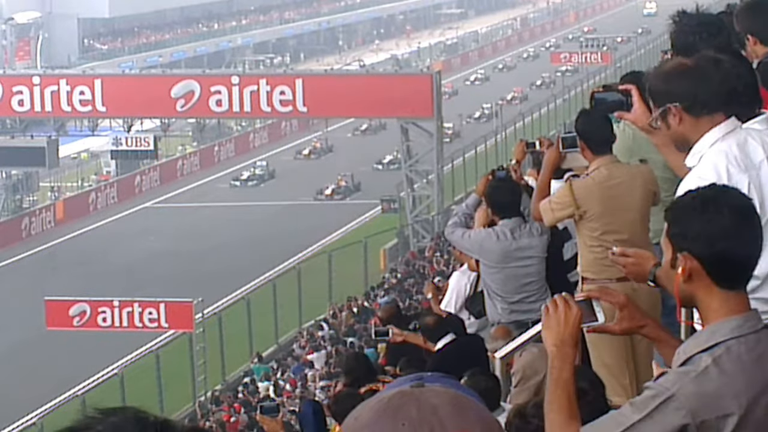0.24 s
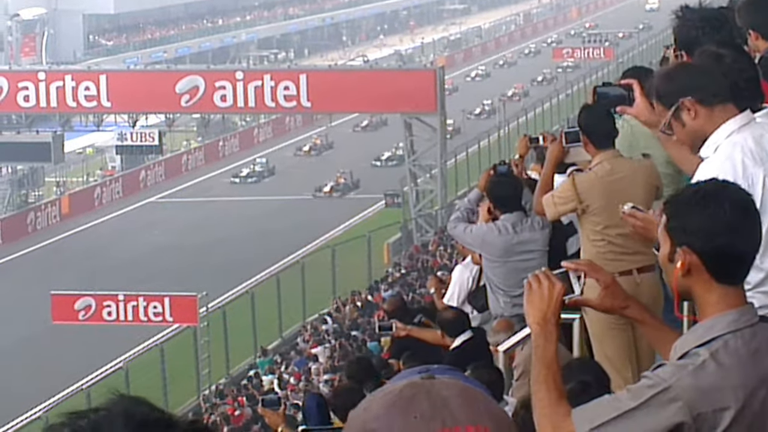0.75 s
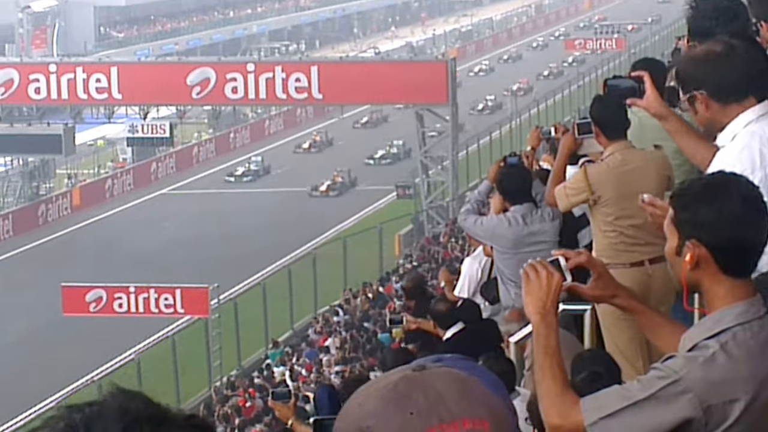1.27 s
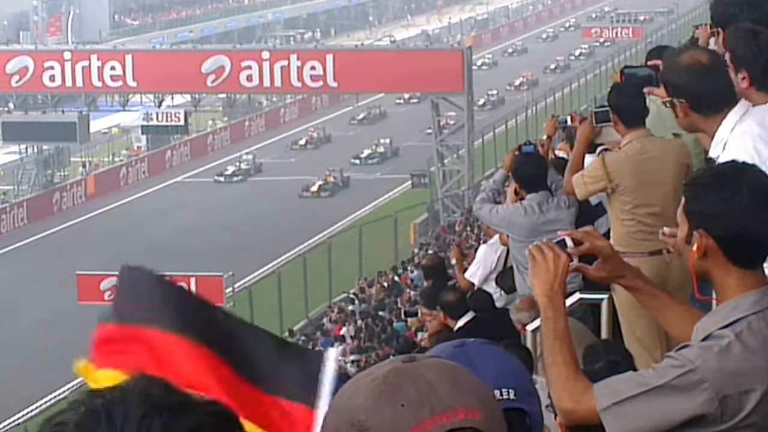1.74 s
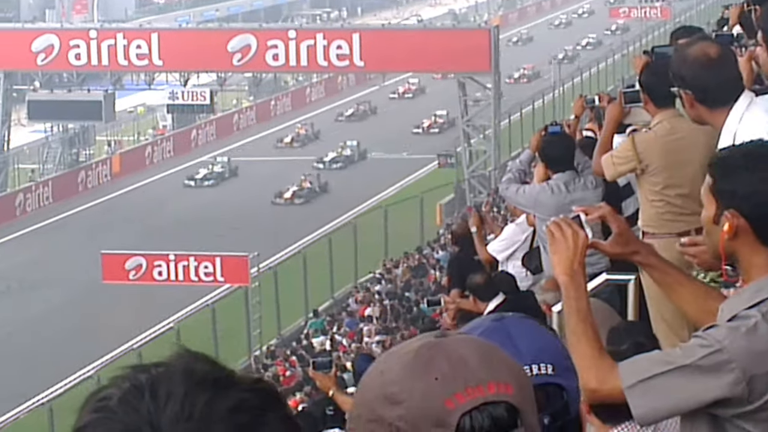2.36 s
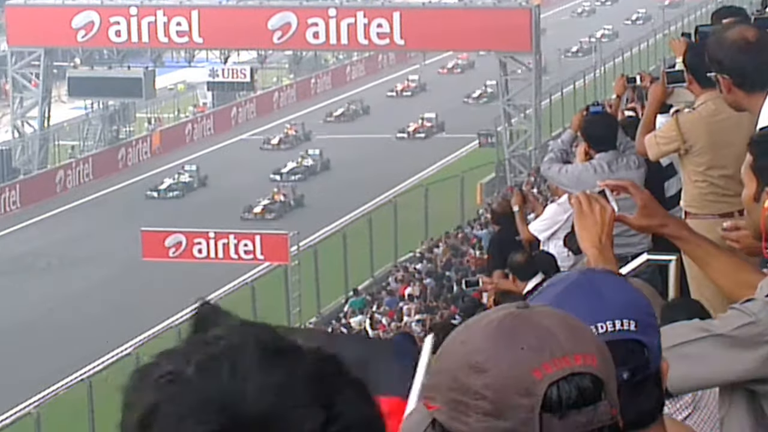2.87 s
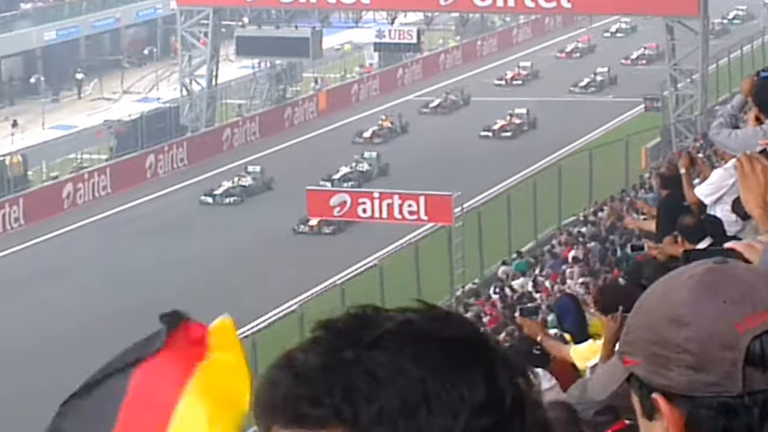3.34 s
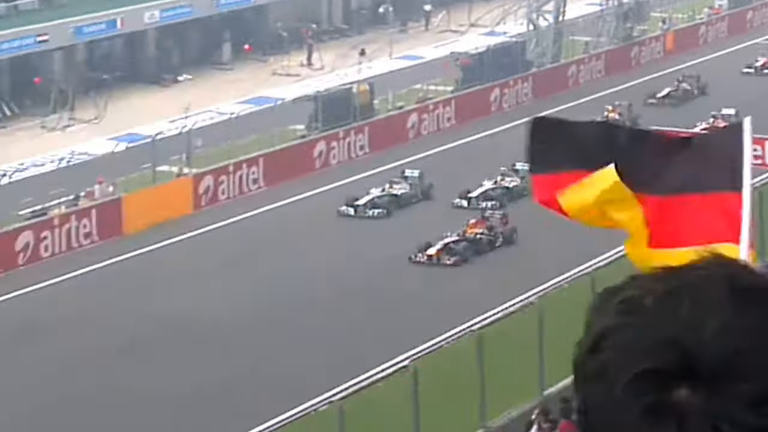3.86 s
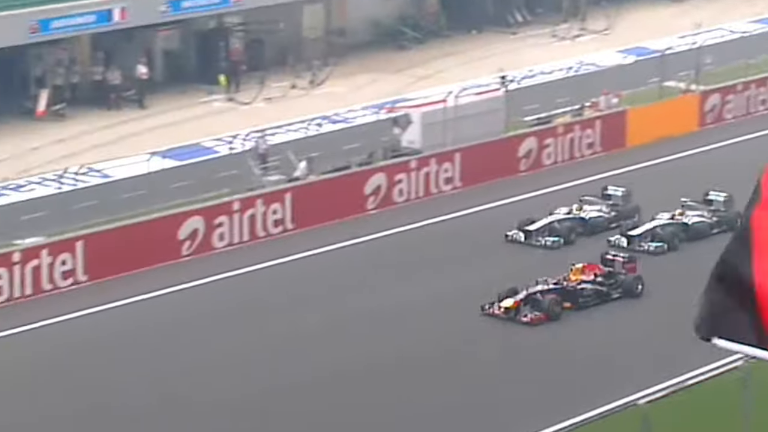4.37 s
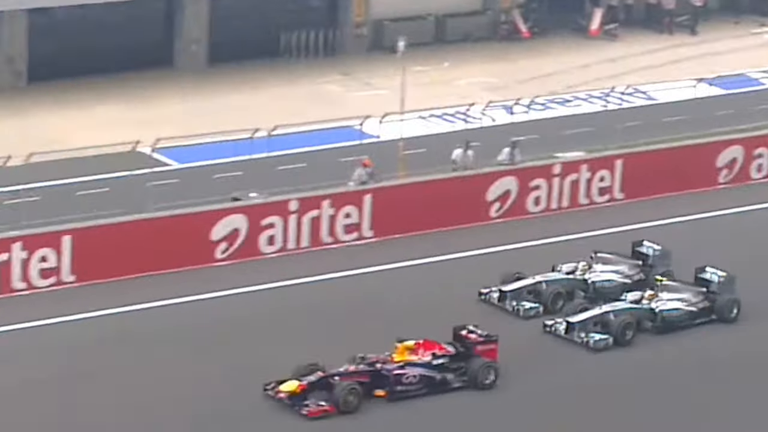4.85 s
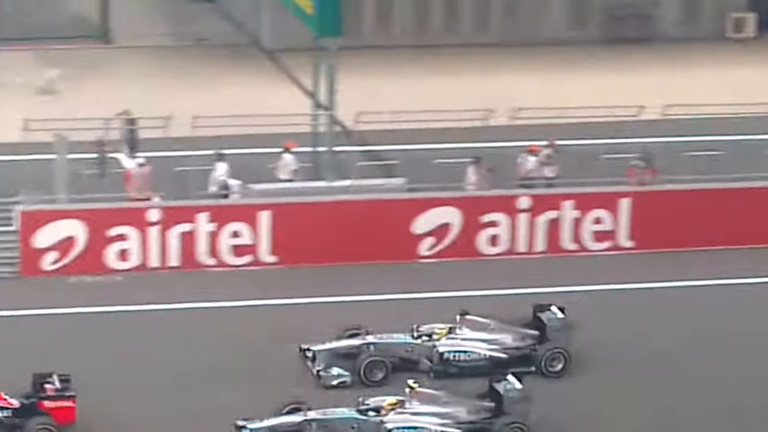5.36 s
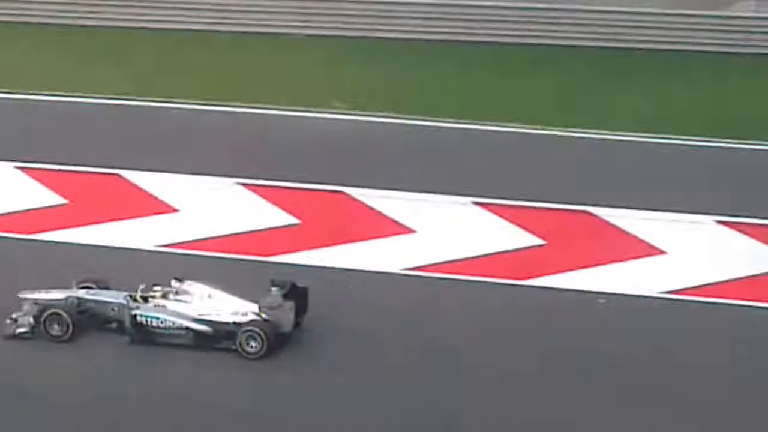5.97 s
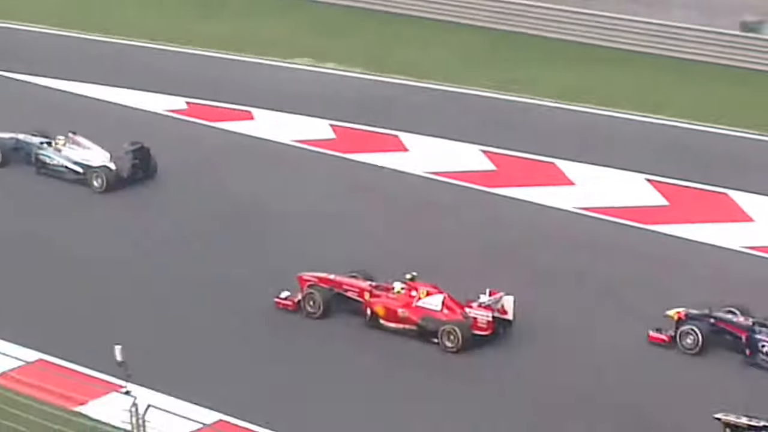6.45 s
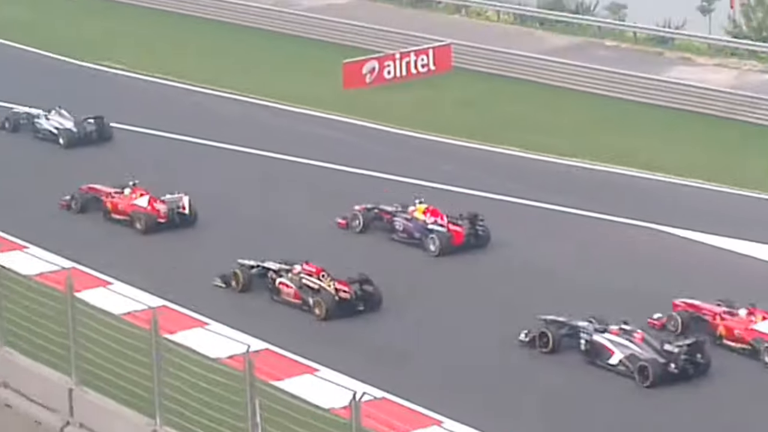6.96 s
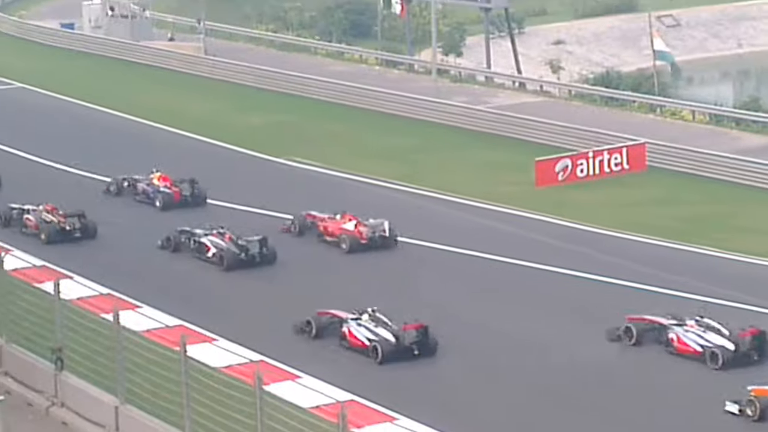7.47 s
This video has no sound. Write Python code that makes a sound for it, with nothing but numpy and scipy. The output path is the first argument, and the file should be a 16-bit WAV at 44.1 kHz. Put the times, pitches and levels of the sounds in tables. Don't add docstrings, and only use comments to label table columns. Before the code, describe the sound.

A grid of high-revving race cars holds a loud, fluttering scream, launches with a low growling bog, then climbs into receding howls past a grandstand.

```python
import sys
import numpy as np
from scipy import signal
from scipy.fft import rfft, irfft, next_fast_len
from scipy.io import wavfile
from scipy.ndimage import uniform_filter1d

SR = 44100
rng = np.random.default_rng(int(sys.argv[2]) if len(sys.argv) > 2 else 0)


def to_linear_factor(level_db):
    exponent = np.asarray(level_db, float) / 20
    return 10 ** exponent


def int16_out(signal):
    q = np.round(np.clip(np.atleast_2d(signal).T, -1, 1) * 32767)
    wavfile.write(sys.argv[1], SR, q.astype(np.int16))


N = 340011
T = np.arange(N) / SR
SIZE = next_fast_len(N + SR)
HZ = np.maximum(np.arange(SIZE // 2 + 1) * SR / SIZE, 1)

# (firing rate of a cylinder bank [Hz], end [s], order 1 [dB], order 2 [dB], order 3 [dB])
GRID = [
    (490.6, .9, -26.5, -30, -28),
    (473.6, 1.22, -41, -27, -26),
    (484.5, 1.1, -44, -22, -40),
    (490.0, 1.27, -46, -29, -31),
    (460.0, .95, -40, -26, -36),
    (453.6, 1.0, -44, -31, -28),
    (430.7, .9, -27, -38, -36),
    (368.5, 1.2, -41, -39, -38),
    (346.0, 1.0, -40, -38, -38),
]
# (time [s], firing rate [Hz], effort [dB])
LAUNCHES = [
    [(1.08, 534.4, 1), (1.25, 539.3, -2.5), (1.36, 557.7, -0.5), (1.65, 563, -2), (1.82, 548, -6)],
    [(1.7, 539.6, -11), (1.88, 510.7, 6.5), (2.0, 506.2, 0), (2.3, 489.5, -10)],
    [(1.7, 343, -2.5), (1.85, 326.6, -0.5), (2.05, 325, 2.5), (2.25, 316, -2.5), (2.45, 324.6, -1)],
    [(1.95, 348.6, -1), (2.2, 337.5, 1.5), (2.35, 343.4, -1.5), (2.47, 355.3, 3), (2.63, 390.2, 1),
     (2.8, 433.3, -24), (3.0, 539, 8.5)],
    [(1.03, 277, 18), (1.25, 267.7, -11.5), (1.5, 282.7, 2), (1.902, 264, 2), (2.399, 277.5, -1.5)],
    [(1.7, 542.4, 0), (1.85, 526, 0), (2.1, 520, -1.5)],
]
# (order 1 [dB], order 2 [dB], .. up to order 4 or 8 [dB])
LAUNCH_ORDERS = [(-50, -23, -35, -39, -50, -37, -50, -50), (-36, -28, -46, -52), (-44, -28, -32, -40),
                 (-39, -34, -41, -46), (-49, -36, -44, -44), (-46, -33, -40, -46, -52, -34.5, -54, -54)]
# (time [s], firing rate [Hz], effort [dB])
RUNS = [
    [(3.0, 626, 4.5), (3.25, 633.2, 2.5), (3.36, 638, -6), (3.5, 636, 3), (3.65, 634, -14)],
    [(3.5, 546, 4.5), (3.8, 584.7, -9), (3.97, 619.5, -1), (4.12, 648, 0.5), (4.3, 655.3, -12)],
    [(3.65, 546.6, 7), (3.85, 563.3, 5.5), (4.05, 582, -5), (4.27, 635, 7.5)],
    [(4.28, 554, 3.5), (4.4, 552.1, 7), (4.6, 586.5, 3), (4.8, 595.3, -8), (5.0, 604.5, -4),
     (5.25, 628.3, -9)],
    [(4.46, 601.4, -1), (4.58, 609, -6), (4.72, 629.4, 2), (4.84, 646, -3), (4.93, 650, -0.5),
     (5.15, 660.5, -8)],
    [(3.05, 507.7, 8), (3.2, 516, -20), (3.55, 494, 3.5), (3.75, 512.8, -3)],
    [(5.12, 568.6, 6), (5.22, 563, 2.5), (5.37, 580, 0)],
    [(5.37, 569, -7), (5.47, 566, 5), (5.57, 559, 1), (5.7, 560.3, -1.5), (5.82, 557.6, 0),
     (6.0, 551.4, -11)],
    [(5.6, 556.4, 1), (5.75, 556.6, -4), (5.9, 547.7, 1), (6.07, 542.6, 3), (6.17, 550.4, -23)],
    [(6.07, 535, -1), (6.2, 529, 3), (6.3, 528, -10), (6.55, 526.8, 5), (6.7, 533, -8)],
    [(6.2, 579, -4), (6.35, 570.2, -5), (6.56, 560, 6)],
    [(6.4, 494, -3), (6.56, 488, 3), (6.75, 509.2, 1), (6.88, 501.3, 0), (7.0, 510, 1), (7.25, 472.2, -9)],
    [(7.03, 643, 1), (7.15, 626.4, -11), (7.3, 641.8, -1), (7.45, 651, 3), (7.55, 647.5, -8)],
    [(7.45, 633, 1), (7.6, 637, -3), (7.75, 630, 2)],
    [(7.25, 610, 1), (7.4, 588, -16), (7.62, 604.7, -7), (7.71, 606, -2)],
]
# (order 1 [dB], order 2 [dB], .. up to order 4 or 8 [dB])
RUN_ORDERS = [(-37, -41, -54, -56), (-44, -38.5, -54, -47, -46, -51, -62, -62), (-44, -43, -53, -62),
              (-47, -48, -55, -62), (-49, -38, -49, -42, -56, -51, -54, -60), (-48, -44, -52, -64),
              (-46, -43, -52, -50), (-53, -47, -47, -42.5, -60, -60, -62, -50), (-60, -39, -52, -60),
              (-68, -45, -50, -60, -60, -56, -45, -64), (-64, -46, -62, -52),
              (-68, -47, -47.5, -55, -60, -49, -62, -62), (-53, -46, -58, -60), (-51, -42, -60, -48),
              (-55, -44.5, -56, -56)]
# (time [s], mean firing rate [Hz], spread between cars [0-1], howl over roar [dB],
# left over right [dB])
PACK = [(0, 457.2, 0.06, 2, 0.5), (.9, 450.8, 0.06, -10.5, 0), (1.3, 318.6, 0.07, -8.5, -0.5),
        (1.7, 325.8, 0.1, 11, 0.5), (2.3, 319.3, 0.13, 4.5, 0), (2.8, 417.9, 0.2, -5, 0),
        (3.2, 558.5, 0.13, 4, 0.5), (4.0, 565.5, 0.15, 3.5, 0.5), (5.0, 597.7, .08, 1.5, -1.5),
        (6.0, 561, 0.07, -7.5, -0.5), (6.8, 532.6, 0.14, -2.5, -0.5), (7.71, 590, 0.07, -5, 1)]
# (time [s], loudness [dB], nearness as treble lift [dB], firing rate of the slowest car [Hz])
APPROACH = [(0, -11.5, -6, 335), (.2, -13.5, -7.5, 350), (.9, -12.5, -3.5, 364), (1.4, -16.5, 6.5, 310),
            (1.7, -16.5, -2.5, 318), (2.1, -14.5, -1, 350), (2.6, -18.5, -5, 353), (3.0, -23, -2, 397.4),
            (3.3, -29.5, 4, 425), (3.7, -24, -4.5, 460), (4.1, -31, 8.5, 513.8), (4.4, -29, 5, 520.2),
            (4.8, -32.5, 17, 527.2), (5.3, -33.5, 17.5, 480), (5.8, -38.5, 26.5, 424),
            (6.4, -37, 25, 464.7), (7.0, -34.5, 18, 473.8), (7.71, -35.5, 19.5, 434)]
# (frequency [Hz], level per Hz [dB])
COLOUR = [(190, -60), (273, -20), (498, -6), (650, -2.5), (820, -1.5), (1130, 4), (1450, -5.5),
          (2010, -12.5), (2900, -8.5), (3800, -12), (4820, -23), (7700, -22), (8600, -28.5), (15800, -40)]
# (edge 1 [Hz], edge 2 [Hz], edge 3 [Hz])
RANGE_EDGES = (430, 1800, 5000)
# (range 1 [dB], .. range 4 [dB])
RANGE_LEVELS = (-17.5, -4.5, -7.5, -24.5)
# (range 1 [dB/dB], .. range 4 [dB/dB])
LIFT_SHARE = (0.01, 0.0036, 0.51, 0.93)
# (range 1 [dB/dB], .. range 4 [dB/dB])
GUST_SHARE = (0.53, 0.23, 0.93, 0.8)
# (time [s], level [dB], length [s])
GUSTS = [(.11, 7, 0.024), (.22, 8.5, 0.029), (.28, -3.5, 0.0079), (.44, 7, 0.1), (.55, -6, 0.049),
         (.73, 7.5, 0.011), (.79, -6.5, 0.027), (.87, 2, 0.049), (.91, -2, 0.046), (1.06, 3, 0.057),
         (1.18, -3.5, 0.045), (1.31, -5, 0.0077), (1.5, 4.5, 0.041), (1.67, -2, 0.045), (1.74, 8, 0.007),
         (1.78, -12, 0.005), (1.87, 10.5, 0.0069), (1.97, 5.5, 0.014), (2.03, -4, 0.025),
         (2.17, 3.5, 0.023), (2.21, -6.5, 0.013), (2.31, -3, 0.024), (2.42, 5.5, 0.013), (2.56, -1, 0.066),
         (2.77, 9.5, 0.013), (2.95, -2.5, 0.036)]
# (time [s], level [dB])
SWEEPS = [(3.87, 4), (4.46, -4.5), (4.55, 6.5), (4.84, 5.5), (5.19, 2.5), (5.27, -4), (5.58, 6.5),
          (5.89, 4), (6.039, -5), (6.131, 5), (6.259, 3.5), (6.41, 5), (7.19, 2.5), (7.24, -1), (7.3, 3),
          (7.54, -6), (7.62, 3.5)]
# (time [s], peak level [dB])
SURGES = [(0.018, 4.5), (0.056, -7.5), (0.124, -5.5), (0.163, -7), (0.21, -6.5), (0.283, -13.5),
          (0.309, -4), (0.39, -1), (0.414, -6), (0.454, -8.5), (0.509, -9), (0.547, -9), (0.586, -7),
          (0.662, -1), (0.724, -10), (0.77, -4), (0.81, 0.5), (0.864, 5), (0.931, -1.5), (0.984, -8),
          (1.013, -5), (1.054, -4), (1.171, -11), (1.211, -0.5), (1.243, -3.5), (1.276, -6.5), (1.318, -12),
          (1.379, -8.5), (1.484, -8.5), (1.544, 0.5), (1.607, -4.5), (1.687, -16), (1.799, -2),
          (1.863, -17), (1.96, -15), (2.009, -4), (2.041, -5), (2.097, -7), (2.253, -0.5), (2.678, -4)]
# (time [s], depth [dB], length [s])
LULLS = [
    (0.529, -3.5, 0.011),
    (.543, -13.5, 0.0031),
    (0.797, -2, 0.004),
    (1.188, -1, 0.0078),
    (1.668, -6, 0.0056),
    (1.682, -12, 0.0044),
    (1.71, -3, 0.011),
    (2.21, 1, 0.03),
]
# (time [s], peak level above 9 kHz [dB])
OVERLOAD_TICKS = [
    (0.0373, -41),
    (0.392, -50),
    (0.4507, -47.5),
    (0.727, -34.5),
    (0.866, -44),
]
# (frequency [Hz], left-right likeness [0-1])
LIKENESS = [(60, 0.44), (150, 0.87), (380, 0.85), (620, 0.7), (950, 0.56), (2380, 0.3), (5980, 0.24),
            (15000, 0.38)]
# (frequency [Hz], left over right [dB])
LEANING = [(60, -1.5), (150, -0.5), (380, 4), (950, 2), (2380, 1.5), (5980, -4.5), (15000, 0)]


def in_time(rows, t=T):
    s, *columns = np.transpose(rows)
    return [np.interp(t, s, column) for column in columns]


def at_hz(points, hz):
    table_hz, value = np.transpose(points)
    return np.interp(np.log(hz), np.log(table_hz), value)


def drift(rate_hz, size=N):
    r = np.exp(-80 * np.pi * rate_hz / SR)
    noise = rng.standard_normal(size // 40 + 1002)
    slow = signal.lfilter([1], [1, -2 * r, r * r], noise)[1000:]
    return np.interp(np.arange(size) / 40, np.arange(len(slow)), slow) * 2 * (1 - r) ** 1.5


def bumps(rows):
    t = T[::32]
    total_db = sum(db * np.exp(-((t - s) / length).clip(-9, 9) ** 2) for s, db, length in rows)
    return np.interp(T, t, total_db)


def shaped(x, response):
    return irfft(rfft(x, SIZE) * response, SIZE)[..., :N]


def evened(x):
    return x / np.sqrt(uniform_filter1d(np.mean(x ** 2, axis=0), size=8820) + 1e-18)


def voiced(curves, orders):
    return [[(s, hz, *np.add(order_db, effort_db)) for s, hz, effort_db in curve]
            for curve, order_db in zip(curves, orders)]


def engine(rows, wobble, fade_db, half_db, upper_db, uneven_db, scatter_hz):
    start, stop = round(rows[0][0] * SR), min(round(rows[-1][0] * SR), N)
    t = T[start:stop]
    size = len(t)
    hz, *order_db = in_time(rows, t)
    phase = 2 * np.pi * np.cumsum(hz * (1 + wobble * drift(18, size))) / SR
    sound = 0
    for k in (*np.arange(1, 5, .5), 5, 6, 7, 8):
        level_db = order_db[min(int(k), len(order_db)) - 1] + half_db * (k % 1 > 0)
        if k > len(order_db):
            slope_db = at_hz(COLOUR, k * hz.mean()) - at_hz(COLOUR, 4 * hz.mean())
            odd_db = -8 * (k % 2 == 1)
            level_db = level_db + upper_db + odd_db + slope_db
        fading_db = fade_db * drift(21.3, size)
        blur = 2 * np.pi * scatter_hz * np.cumsum(drift(25, size)) / SR
        sound = sound + to_linear_factor(level_db + fading_db) * np.sin(k * phase + rng.uniform(0, 2 * np.pi) + blur)
    fade_in = t - t[0] + (start == 0)
    ramp = np.minimum(1, np.minimum(fade_in, T[stop - 1] - t) / 0.038)
    uneven_burning = to_linear_factor(uneven_db * drift(30, size))
    out = np.zeros(N)
    out[start:stop] = np.sqrt(2) * sound * ramp * uneven_burning
    return out


def single_engines():
    holds = [[(0, hz, 0), (until - .15, hz, 0), (until, hz, -5)] for hz, until, *_ in GRID]
    hold_orders = [(*orders, -39) for _, _, *orders in GRID]
    held = sum(engine(car, wobble=.0025, fade_db=2.0, half_db=-20, upper_db=-9, uneven_db=2.4, scatter_hz=5)
               for car in voiced(holds, hold_orders))
    launching = sum(engine(car, wobble=.005, fade_db=2.2, half_db=-18, upper_db=-5, uneven_db=2.6, scatter_hz=11)
                    for car in voiced(LAUNCHES, LAUNCH_ORDERS))
    racing = sum(engine(car, wobble=.002, fade_db=2.0, half_db=-18, upper_db=-4, uneven_db=2.4, scatter_hz=8)
                 for car in voiced(RUNS, RUN_ORDERS))
    return to_linear_factor(-1.26) * held + launching + racing


def howl(mean_hz, spread, count):
    out = np.zeros((2, N))
    for k, place in enumerate(np.linspace(-1, 1, count)):
        rate = mean_hz * (1 + spread * (place + .5 * drift(.8)) + .008 * drift(30))
        cycles = np.cumsum(rate) / SR + rng.random()
        fired = np.flatnonzero(np.diff(np.floor(cycles)))
        strength = to_linear_factor(0.89 * rng.standard_normal(len(fired)) + 0.71 * drift(7.9)[fired])
        out[0, fired] += strength
        out[1, fired] += strength * (-1) ** k
    return out / np.std(out)


def pack():
    mean_hz, spread, howl_db, _ = in_time(PACK)
    roar = rng.standard_normal((2, N))
    source = shaped(to_linear_factor(howl_db) * howl(mean_hz, spread, count=12) + roar, to_linear_factor(at_hz(COLOUR, HZ)))
    loud_db, lift_db, slowest_hz = in_time(APPROACH)
    gust_db = bumps(GUSTS) + bumps([(s, db, 0.014) for s, db in SWEEPS])
    levels_db = loud_db + np.outer(RANGE_LEVELS, np.ones(N))
    levels_db = levels_db + np.outer(LIFT_SHARE, lift_db) + np.outer(GUST_SHARE, gust_db)
    levels_db[0] -= 18.5 * np.log2(slowest_hz / 350)
    below = [0] + [1 / (1 + (HZ / edge) ** 8) for edge in RANGE_EDGES] + [1]
    flutter = drift(37)
    out = 0
    for low, high, level_db, shake_db in zip(below, below[1:], levels_db, (1.0, 0.76, 0.73, 1.0)):
        band = shaped(source, np.sqrt(high - low))
        out = out + evened(band) * to_linear_factor(level_db + shake_db * (flutter + drift(22)))
    return out


def surges_and_lulls():
    s, peak_db = np.transpose(SURGES)
    swell_db = 0.51 * (peak_db - in_time(APPROACH, s)[0] - 5.5)
    swells = [(at + 0.0034, db, 0.0067) for at, db in zip(s, swell_db)]
    return to_linear_factor(bumps(LULLS) + bumps(swells))


def overload_ticks():
    s, peak_db = np.transpose(OVERLOAD_TICKS)
    clicks = np.zeros(N)
    clicks[np.round(s * SR).astype(int)] = to_linear_factor(peak_db)
    r, w = to_linear_factor(-60 / (0.01 * SR)), 2 * np.pi * 1150 / SR
    ring = signal.lfilter([0, np.sin(w)], [1, -2 * r * np.cos(w), r * r], clicks + 1e-18)
    return to_linear_factor(5.5) * clicks + to_linear_factor(-10.0) * ring


def grandstand(x):
    t, t60_s = T[:SR], 0.87
    tail = rng.standard_normal((2, SR)) * to_linear_factor(-60 * t / t60_s) * (t > .012)
    tail = tail / np.sqrt(np.sum(tail ** 2, axis=1, keepdims=True))
    return shaped(x, rfft(tail, SIZE) / np.sqrt(1 + (HZ / 3500) ** 2))


def rumble(level_db):
    band = 1 / np.sqrt((1 + (189 / HZ) ** 8) * (1 + (HZ / 310) ** 6))
    low = shaped(rng.standard_normal(N), band)
    return low / np.std(low) * to_linear_factor(level_db + 0.83 * drift(8.8))


def to_stereo(mid, side):
    alike = np.clip(at_hz(LIKENESS, HZ), 0, 1)
    lean = to_linear_factor(at_hz(LEANING, HZ) / 2)
    mid = rfft(mid, SIZE) * np.sqrt(1 + alike)
    side = rfft(side, SIZE) * np.sqrt(1 - alike)
    return irfft([(mid + side) * lean, (mid - side) / lean], SIZE)[:, :N]


def microphones(ports):
    ports = ports / (1 + np.abs(ports / .97) ** 6) ** (1 / 6)
    return shaped(ports, 1 / np.sqrt(1 + (70 / HZ) ** 2))


def dulled(ports, loud_db):
    shelf = shaped(ports, 1 / (1 + (7520 / HZ) ** 16))
    ports = ports - shelf * (1 - to_linear_factor(-0.37 * (loud_db + 36)))
    top = shaped(ports, 1 / (1 + (10600 / HZ) ** 28))
    top_db = -.25 * np.maximum(loud_db + 29, 0) ** 2
    return ports - top * (1 - to_linear_factor(top_db))


def scene():
    loud_db, lift_db, _ = in_time(APPROACH)
    cars = single_engines()
    echoes = grandstand(cars)
    mid, side = pack() * to_linear_factor(-4.5)
    low_rumble = rumble(-82 + 0.24 * (loud_db + 36) + 0.31 * lift_db)
    mid = mid + to_linear_factor(-3.5) * cars + to_linear_factor(-11) * echoes[0] + low_rumble
    side = (side + to_linear_factor(-3.5) * echoes[1]) * to_linear_factor(-1 + 0.1014 * lift_db)
    gain = surges_and_lulls()
    pan_db = in_time(PACK)[-1]
    ports = to_stereo(mid * gain, side * gain) * to_linear_factor([pan_db / 2, -pan_db / 2])
    return dulled(microphones(ports), loud_db) + overload_ticks()


def band_limit(x):
    return signal.sosfilt(signal.butter(12, 15770, fs=SR, output="sos"), x)


def record(dry):
    return band_limit(dry)


dry = scene()
out = record(dry)
int16_out(out)
```